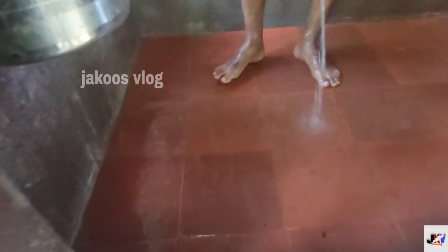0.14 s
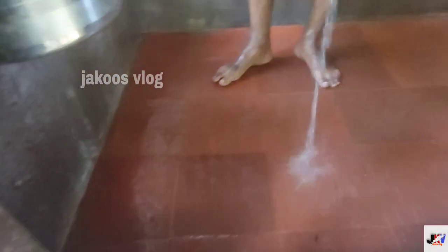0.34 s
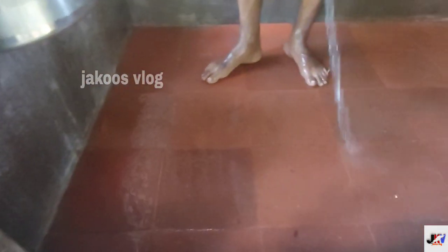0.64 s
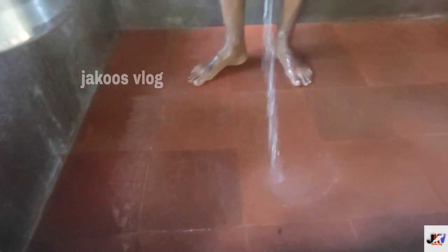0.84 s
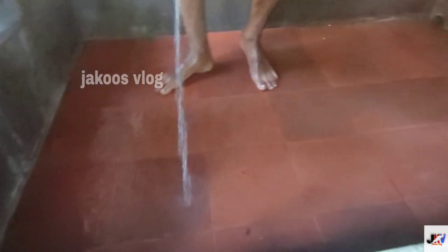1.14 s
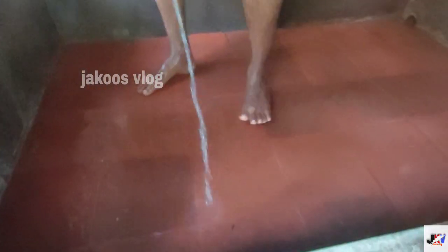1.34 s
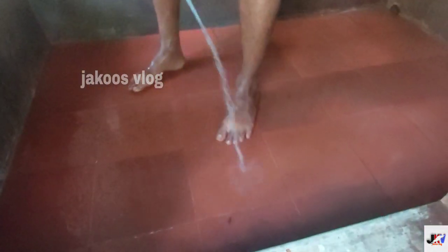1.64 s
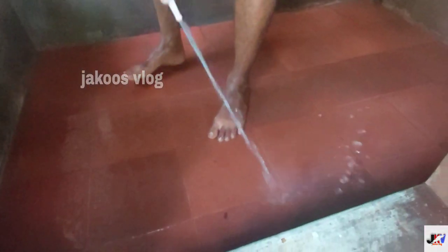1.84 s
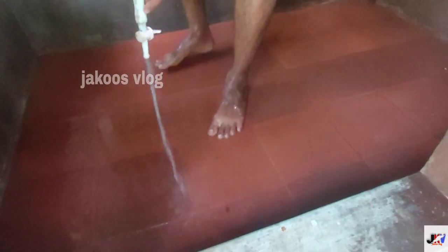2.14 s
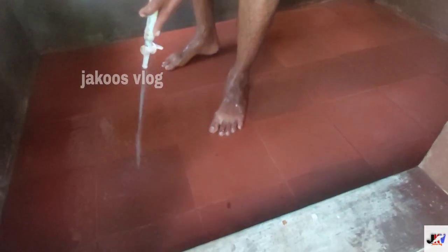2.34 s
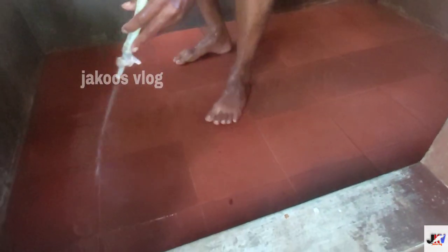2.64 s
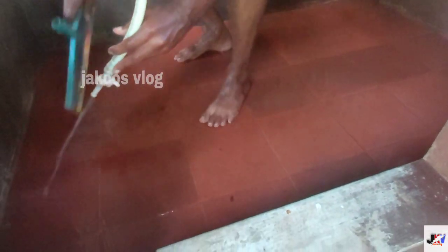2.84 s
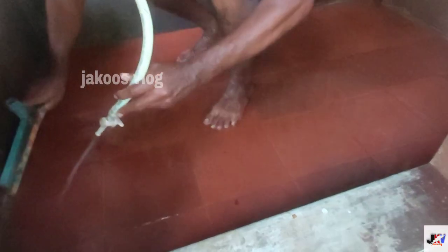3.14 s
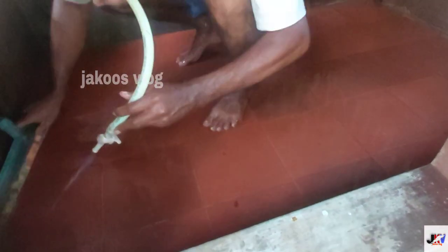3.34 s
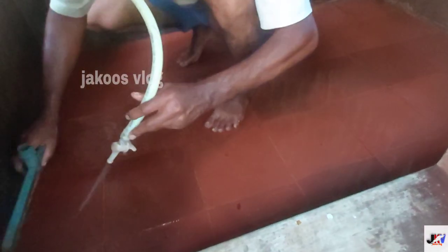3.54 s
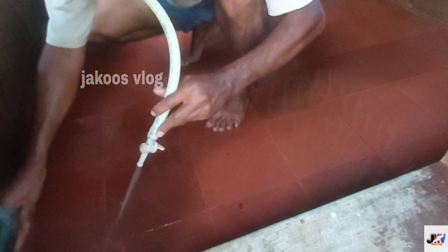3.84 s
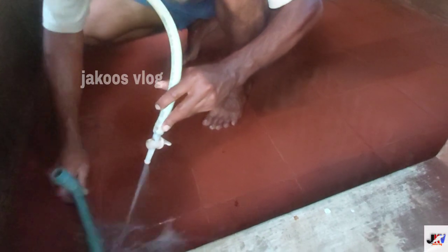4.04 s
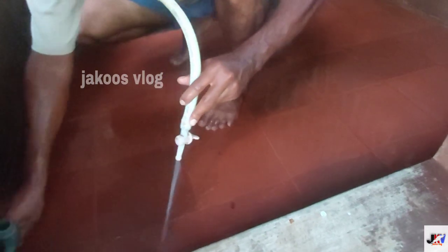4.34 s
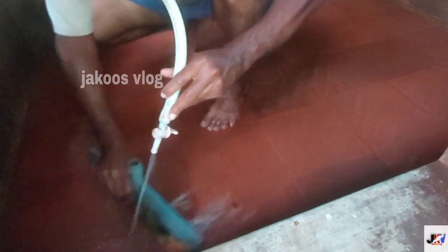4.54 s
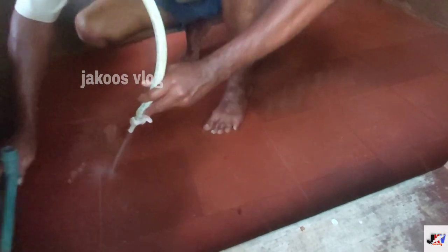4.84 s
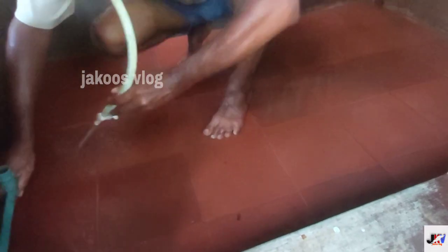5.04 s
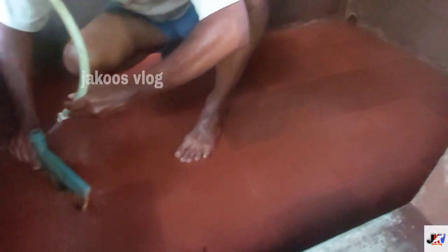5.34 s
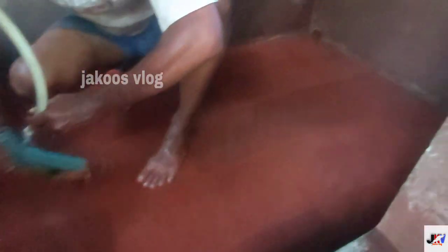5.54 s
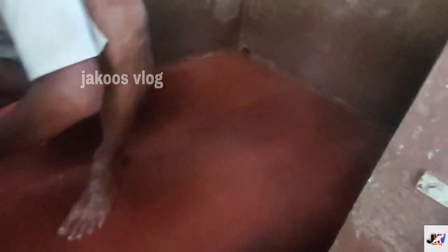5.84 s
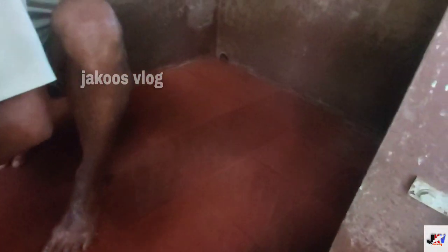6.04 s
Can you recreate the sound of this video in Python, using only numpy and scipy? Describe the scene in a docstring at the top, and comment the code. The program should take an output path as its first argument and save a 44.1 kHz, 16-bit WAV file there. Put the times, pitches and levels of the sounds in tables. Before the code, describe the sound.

A thin hose stream crackles and spatters on wet tiles, then eases while a hand brush knocks and scrubs in short hissing strokes.

```python
"""Water slugs crack and spatter on wet tiles over a fine spray: a thin hose stream in a walled yard.
Each slug is a click and a swell of coarse droplet bursts; the spray is denser bursts of even size.
Distant traffic rumbles below as banded noise. Later a hand brush knocks down on the tiles and scrubs
in short strokes: bristles hiss as dense bursts, while slips and knocks ring the modes of its body."""
import sys
import numpy as np
from scipy import signal
from scipy.fft import rfft, irfft, next_fast_len
from scipy.io import wavfile

SR = 44100
rng = np.random.default_rng(int(sys.argv[2]) if len(sys.argv) > 2 else 0)


def master(y):
    """Save y as 16-bit WAV."""
    cut = np.clip(np.atleast_2d(y).T, -1, 1)
    pcm = np.round(cut * 32767)  # scale
    wavfile.write(sys.argv[1], SR, pcm.astype(np.int16))


N = 273861

# Fine spray of the stream. Each row: time in seconds, level at 6-15 kHz in dB,
# level at 2-5 kHz against it in dB.
SPRAY = [(0, -19.5, -11), (.16, -33, -6), (.76, -30, -11.5), (1.0, -34, -5.5), (1.24, -37, -4.5),
         (1.38, -31, -6.5), (1.5, -33, -4.5), (1.62, -32, -8), (1.78, -32, -10.5), (2.13, -30, -12),
         (2.5, -38.5, -9.5), (2.72, -42, -7), (2.95, -37, -8), (3.4, -40.5, -4), (3.8, -35, -7),
         (4.25, -41.5, -3.5), (4.85, -34.5, -9.5), (5.2, -38.5, -12), (5.7, -42, -9), (6.21, -41, 0)]
# Colour of the water sounds. Each row: frequency in Hz, density in dB per Hz.
WATER = [(590, -58), (1000, -35), (1190, -33.5), (1640, -21.5), (1840, -65), (2360, -13), (3740, -11.5),
         (4490, -6.5), (6790, -10.5), (7880, -0.5), (9040, -4.5), (11200, 1), (15500, -1)]


def amp(db):
    """Decibels are logarithmic: 20 dB is a factor of ten in amplitude."""
    return np.exp(np.asarray(db) * np.log(10) / 20)


def rms_one(x):
    """Normalization to unit effective value."""
    return x / np.sqrt(np.mean(x ** 2) + 1e-20)


def in_time(rows, **outside):
    """Linear interpolation of each column over time, one value per sample."""
    seconds, *columns = np.transpose(rows)
    return np.array([np.interp(np.arange(N) / SR, seconds, column, **outside) for column in columns])


def at_hz(points, hz):
    """Interpolation of a spectrum on a logarithmic frequency axis."""
    point_hz, values = np.array(points).T
    return np.interp(np.log(hz), np.log(point_hz), values)


def drift(rate_hz):
    """Slow random fluctuation: low-passed noise of unit effective value."""
    step = 40   # samples per slow value
    r = np.exp(-2 * np.pi * rate_hz * step / SR)
    noise = rng.standard_normal(N // step + 2002)
    slow = signal.lfilter([1], [1, -2 * r, r * r], noise)[2000:]
    return np.interp(np.arange(N) / step, np.arange(len(slow)), rms_one(slow))


def ports(mid, side, hz):
    """Interchannel coherence and delay: two microphone ports hear partly alike, the left one later."""
    # Each row: frequency in Hz, left-right likeness from 0 to 1.
    likeness = [(30, 1), (150, 0.93), (400, 0.98), (800, 0.73), (2000, 0.14), (8000, 0.086)]
    left_lag = 12   # samples: the sources lie to the right
    alike = np.clip(at_hz(likeness, hz), 0, 1)
    mid = np.sqrt(1 + alike) * mid
    side = np.sqrt(1 - alike) * side
    return np.array([np.roll(mid + side, left_lag), mid - side]) / np.sqrt(2)


def banded(excitation, gain_at, low_hz, high_hz, count):
    """Subband synthesis: neighbouring band-passes ring to unrelated excitations, each with its own gain."""
    out, edges = 0, np.geomspace(low_hz, high_hz, count)
    for k, (low, high) in enumerate(zip(edges, edges[1:])):
        centre_hz = np.sqrt(low * high)
        band_pass = signal.butter(2, [low, high], "band", fs=SR, output="sos")
        mid, side = signal.sosfilt(band_pass, excitation[k % 2] * gain_at(centre_hz))
        out = out + ports(mid, side, centre_hz)
    return out


def droplets(per_s, spread_db, bed):
    """Shot noise: short random bursts on a noise bed, sizes spread in dB; two sets of mid and side."""
    sizes = amp(spread_db * np.minimum(rng.exponential(1, (2, 1, N)), 5))
    impulses = sizes * (rng.random((2, 1, N)) < per_s / SR)
    bursts = rms_one(signal.lfilter([1], [1, -.9], impulses))
    return rms_one((bed + bursts) * rng.standard_normal((2, 2, N)))


def shaped(spectrum, bands):
    """Power summation: the dB offset per (low, high) band that brings its summed level to 0 dB."""
    offsets_db = []
    for low, high in bands:
        power = np.mean(amp(2 * at_hz(spectrum, np.linspace(low, high, 50)))) * (high - low)
        offsets_db.append(10 * np.log10(SR / 2 / power))
    return np.array(offsets_db)


def between(levels_db, centres_hz, hz):
    """Interpolation of band levels on a logarithmic frequency axis."""
    place = np.interp(np.log(hz), np.log(centres_hz), np.arange(len(centres_hz)))
    low = min(int(place), len(centres_hz) - 2)
    return levels_db[low] + (place - low) * (levels_db[low + 1] - levels_db[low])


def around(hz, pitch_hz, above_db, below_db):
    """Spectral peak: a constant loss per octave on either side of a pitch."""
    octaves = np.log2(np.asarray(hz) / pitch_hz)
    return np.minimum(-above_db * octaves, below_db * octaves)


def small_slugs():
    """Random arrivals: small slugs at chance times, set over the spray; rows like those of splats."""
    per_s, over_spray_db, t60_s = 6.3, 2.5, 0.15
    fine_db = in_time(SPRAY)[0]
    draw = rng.random((round(per_s * N / SR), 4)) * [N / SR - .01, 1, 1, 1]
    return [(s, fine_db[int(s * SR)] + over_spray_db + 5.0 * a, -30 + 15 * b, 5500 * 2 ** c, t60_s)
            for s, a, b, c in draw]


def slugs():
    """Impact and spatter: each slug hits with a crack, then scatters coarse droplets that die away."""
    # Clear splats of water, and the onset of a brush stroke at 3.859. Each row: start in seconds,
    # peak level in dB, weight (2-4.5 kHz against the peak level) in dB, pitch of the spatter in Hz,
    # decay time t60 in seconds.
    splats = [(0.075, -32, -27, 13100, 0.049), (0.1203, -11.5, -8, 5190, 0.14),
              (0.194, -15.5, -20, 11800, 0.36), (0.271, -19, -32, 11700, 0.18),
              (0.3463, -8, -30, 11000, 0.12), (0.3945, -5, -21, 5240, 0.14),
              (0.4394, -16.5, -21, 10500, 0.17), (0.4597, -11.5, -18.5, 14400, 0.11),
              (0.4803, -2.5, -30, 7600, 0.087), (0.5641, -12, -21, 7900, 0.17),
              (0.5902, -13.5, -4.5, 5340, 0.14), (0.632, -30, -20, 11500, 0.097),
              (0.6824, -18, -33, 10200, 0.12), (0.7117, -8.5, -30, 11600, 0.075),
              (0.762, -9, -27, 14400, 0.14), (0.8486, -10, -36, 10900, 0.13),
              (0.87, -15.5, -17.5, 9500, 0.36), (0.9223, -12.5, -19.5, 14700, 0.15),
              (1.034, -16, -29, 14500, 0.28), (1.1376, -17, -29, 8060, 0.12),
              (1.1686, -8.5, -16.5, 4650, 0.23), (1.1987, -5, -18, 4540, 0.15),
              (1.2982, -14, -12.5, 11600, 0.1), (1.3221, -7.5, -19.5, 4790, 0.11),
              (1.3528, -15, -15.5, 7710, 0.15), (1.398, -10, -24, 11800, 0.056),
              (1.4158, -11.5, -17, 7600, 0.16), (1.5256, -7.5, -7.5, 7160, 0.081),
              (1.5596, -8, -22, 4520, 0.12), (1.5794, -4, -23, 8000, 0.11), (1.658, -15, -15.5, 8400, 0.11),
              (1.724, -16, -41, 13900, 0.14), (1.7943, -11.5, -22.5, 7800, 0.1),
              (1.8308, -5.5, -13.5, 4530, 0.13), (1.8951, -7.5, -23, 8100, 0.18),
              (1.9729, -11.5, -27, 7930, 0.12), (2.0283, -15, -24, 11700, 0.094),
              (2.0997, -14.5, -30, 8900, 0.22), (2.1974, -23, -32, 8660, 0.12),
              (2.2134, -20, -30, 13000, 0.12), (2.2373, -13.5, -15.5, 7600, 0.18),
              (2.2682, -12, -26, 11800, 0.074), (2.3105, -10.5, -35, 7800, 0.067),
              (2.394, -23, -30, 11400, 0.11), (2.4545, -31, -15, 10300, 0.27),
              (2.4924, -25, -27, 11400, 0.082), (2.6712, -21, -27, 11500, 0.16),
              (2.7444, -17.5, -27, 7900, 0.079), (2.7708, -10, -16.5, 7840, 0.067),
              (2.8155, -20, -37, 14700, 0.11), (2.8724, -23.5, -34, 10700, 0.14),
              (2.9153, -26, -30, 10400, 0.088), (2.9693, -16, -34, 13500, 0.07),
              (3.039, -29, -27, 11700, 0.2), (3.0742, -10, -27.5, 11600, 0.091),
              (3.12, -5, -29.5, 8800, 0.068), (3.279, -24.5, -41, 9400, 0.15),
              (3.324, -23.5, -19, 8500, 0.13), (3.3598, -23, -16, 11800, 0.1),
              (3.3825, -19.5, -24, 7800, 0.14), (3.4154, -16, -19, 8340, 0.086),
              (3.443, -13, -38, 7500, 0.085), (3.484, -18.5, -32, 10100, 0.2),
              (3.5149, -9, -29, 5890, 0.056), (3.5554, -25, -18, 7520, 0.16),
              (3.6193, -13.5, -40, 10800, 0.061), (3.6566, -23, -36, 11400, 0.11),
              (3.693, -24, -21, 11900, 0.087), (3.7155, -17, -25, 13000, 0.085),
              (3.7512, -14.5, -18.5, 8200, 0.075), (3.859, -13.5, -41, 7750, 0.22),
              (3.988, -17, -18, 7870, 0.088), (4.2406, -20, -16, 5060, 0.065),
              (4.2747, -8.5, -31, 10600, 0.061), (4.2964, -16, -19, 9340, 0.19),
              (4.3285, -7.5, -32, 7600, 0.11), (4.3794, -21, -26, 8160, 0.12),
              (4.4595, -14, -32, 10200, 0.092), (4.7974, -26, -8.5, 7970, 0.15),
              (4.8293, -16, -25, 8020, 0.08), (4.8668, -18, -48, 10400, 0.14),
              (4.8933, -18, -51, 7950, 0.083), (4.9474, -15.5, -29, 12000, 0.19),
              (5.0255, -27.5, -5, 8400, 0.13), (5.1136, -21, -33, 7900, 0.1),
              (5.152, -18, -45, 8150, 0.087), (5.194, -14.5, -50, 9900, 0.13),
              (5.251, -15.5, -37, 8040, 0.11), (5.5907, -9, -35, 6910, 0.057),
              (5.6192, -9, -32, 6650, 0.14), (5.7005, -14.5, -36, 11500, 0.11),
              (5.8714, -18.5, -10, 6900, 0.067), (5.9105, -30, -12, 9130, 0.12),
              (5.9374, -21.5, -6, 7850, 0.096)]
    spatter_db = -7.5   # at its pitch, against the peak level
    centres_hz = np.array([3500, 6070, 9050, 12700])
    power, t = np.full((4, N), 1e-12), np.arange(SR // 4) / SR
    # the crack leads the swell, less so in the treble
    crack = np.outer(1.46 * (centres_hz / 6000) ** -0.5, np.exp(-t / 0.0011))
    attack = 1 - np.exp(-t / 0.0034) + crack
    for s, peak_db, weight_db, pitch_hz, t60_s in list(splats) + small_slugs():
        at = round(s * SR)
        colour_db = spatter_db + around(centres_hz[1:], pitch_hz, above_db=9.5, below_db=6.5)
        level = amp(peak_db + np.r_[weight_db - 2.5, colour_db])
        envelope = level[:, None] * attack * amp(-60 * t / t60_s)
        power[:, at:at + len(t)] += envelope[:, :N - at] ** 2
    bands = [(2000, 4780), (4500, 9830), (8000, 13320), (11500, 18900)]
    splat_db = 10 * np.log10(power) + shaped(WATER, bands)[:, None]
    coarse = droplets(1400, spread_db=5.0, bed=0.89)
    # the hard contact is one click in every band
    coarse[:, 0, [round(row[0] * SR) + 20 for row in splats]] = 9.5

    def gain_at(hz):
        return amp(at_hz(WATER, hz) + between(splat_db, centres_hz, hz) + 3.21 * drift(33.0))
    return banded(coarse, gain_at, 886, 17890, count=18)


def spray():
    """Dense shot noise: many fine droplets of even size merge into a wavering hiss."""
    fine_db, mid_db = in_time(SPRAY)
    offsets_db = shaped(WATER, [(2000, 5800), (6000, 16500)])[:, None]
    spray_db = np.array([fine_db + mid_db, fine_db]) + offsets_db

    def gain_at(hz):
        return amp(at_hz(WATER, hz) + between(spray_db, [3200, 9000], hz) - 2.0 + 2.0 * drift(19.0))
    return banded(droplets(5600, spread_db=0.0, bed=1.0), gain_at, 886, 17890, count=18)


def yard(x):
    """Reverberation: walls send back a short diffuse decaying tail, different in each channel."""
    t60_s, level_db = 0.18, -9.5
    t = np.arange(int(.4 * SR)) / SR
    tail = rng.standard_normal((2, len(t))) * amp(-60 * t / t60_s) * (t > .004)
    tail = tail / np.sqrt(np.sum(tail ** 2, axis=1, keepdims=True))
    return amp(level_db) * signal.fftconvolve(x, tail, axes=1)[:, :N]


def traffic():
    """Filtered noise: low rumble and a faint wash above it, wavering band by band."""
    # Far swells. Each row: time in seconds, rumble at 25-150 Hz in dB, wash at 400-1500 Hz in dB.
    swells = [(0, -41, -52), (.5, -46, -53.5), (1.3, -41.5, -56), (1.55, -45, -49), (2.1, -46, -54.5),
              (3, -42, -55.5), (3.7, -43, -46), (4.25, -43.5, -56), (5.0, -43, -49.5), (5.5, -49, -46.5),
              (5.8, -44, -55.5), (6.21, -43.5, -53)]
    # Colour. Each row: frequency in Hz, density in dB per Hz.
    rumble = [(13, -42), (22, -11.5), (49, -2), (75, -1), (98, -1), (127, -12), (380, -20), (495, -22),
              (534, -28), (587, -19.5), (958, -20.5), (1180, -23.5), (2000, -20.5), (2600, -54),
              (4400, -120)]
    level_db = in_time(swells) + shaped(rumble, [(25, 160), (400, 1550)])[:, None]

    def gain_at(hz):
        return amp(at_hz(rumble, hz) + between(level_db, [80, 600], hz) + 1.57 * drift(4.0))
    return banded(rng.standard_normal((2, 2, N)), gain_at, 26.6, 2352, count=18)


def brush_body(body_db):
    """Modal resonance: bristle slips and dull knocks excite the same damped modes."""
    # Modes of the body. Each row: frequency in Hz, level in dB, decay time t60 in seconds.
    modes = [(134, -1, 0.17), (172, -2, 0.13), (227.4, 1, 0.12), (285, -6, 0.084), (332, 1, 0.21),
             (397.7, -3, 0.12), (467, -2.5, 0.088), (544, 3.5, 0.13), (602, -6.5, 0.12), (673, 6.5, 0.09),
             (746, 4.5, 0.11), (832.4, 2.5, .1), (904, 1, 0.14), (973, 7, 0.061), (1070, -0.5, 0.013),
             (1264, 5, 0.067), (1411, -4.5, 0.14), (1560, 6, 0.055), (1735, 3, 0.039), (1976, 4.5, 0.075),
             (2510, 3.5, 0.03)]
    # Mostly the brush set down or bumped. Each row: start in seconds, relative peak level in dB,
    # pitch struck most in Hz, loss an octave from it in dB.
    knocks = [(1.523, -36.5, 1600, 2), (3.098, -44, 600, 5), (3.371, -30, 500, 3), (3.722, -29.5, 545, 14),
              (3.804, -25, 694, 0), (4.31, -24, 710, 3), (4.366, -24.5, 497, 8), (4.385, -20.5, 500, 8),
              (4.404, -15, 335, 16), (4.963, -26.5, 820, 10), (5.027, -26, 990, 1.5),
              (5.073, -11.5, 813, 58), (5.756, -36.5, 302, 0), (5.866, -12.5, 245, 8),
              (5.947, -14, 132, 45)]
    rattle_s, knock_reach_db = 0.0045, -20   # no mode loses more than the reach
    slips, out, t = droplets(900, spread_db=3.0, bed=0.38), 0, np.arange(SR // 10) / SR
    for k, (hz, level_db, t60_s) in enumerate(modes):
        force = slips[k % 2] * amp(between(body_db, [280, 750], hz) - 34.5 + 5.04 * drift(7.9))
        force = force * np.clip(hz / 230, 0, 1) ** 14.0   # dragging hardly moves the lowest modes
        force = force * np.clip(1000 / hz, 0, 1) ** 2.8   # nor the highest
        for s, peak_db, pitch_hz, fall_db in knocks:
            at = round(s * SR)
            # a short decaying rattle that begins just before the blow
            blow = rng.standard_normal((2, len(t))) * np.exp(-t / rattle_s) / np.sqrt(rattle_s * SR)
            # the blow itself: one sharp click 2.5 ms after the row's start
            blow[0, round(.0025 * SR)] += 0.86 * (-1) ** k
            loss_db = max(-fall_db * np.log2(hz / pitch_hz) ** 2, knock_reach_db)
            force[:, at:at + len(t)] += amp(peak_db - 9.0 + loss_db) * blow
        r, w = amp(-60 / (t60_s * SR)), 2 * np.pi * hz / SR
        mid, side = signal.lfilter([0, np.sin(w)], [1, -2 * r * np.cos(w), r * r], force)
        out = out + amp(level_db) * ports(mid, side, hz)
    return out


def bristles(scrape_db, hiss_db):
    """Friction noise: dragged bristles give a dense hiss of small bursts."""
    # Colour. Each row: frequency in Hz, density in dB per Hz.
    colour = [(590, -40), (1000, -10.5), (1100, -23), (1270, 7), (1710, -11.5), (2870, 4), (3300, -4.5),
              (5340, -3), (6710, -8.5), (7880, 0), (8740, -8), (14800, -11), (15500, -35)]
    offsets_db = shaped(colour, [(1500, 2870), (6000, 18000)])[:, None]
    bristle_db = np.array([scrape_db, hiss_db]) + offsets_db

    def gain_at(hz):
        return amp(at_hz(colour, hz) + between(bristle_db, [2800, 9000], hz) + 2.06 * drift(15.0))
    return banded(droplets(8300, spread_db=1.5, bed=0.54), gain_at, 837, 19540, count=14)


def brush():
    """Friction drive: stroke speed sets the hiss, pressure the ring of the body, both the scrape."""
    # One table per stroke. Each row: time in seconds, speed as bristle hiss in dB,
    # pressure as ring of the body in dB, low modes against high in dB.
    strokes = [
        [(3.42, -39, -49, -14), (3.46, -36, -37, -37), (3.512, -35, -39, -38), (3.58, -43, -64, -12)],
        [(3.8, -33.5, -37, -4), (3.85, -28, -52, -1), (3.94, -29, -46.5, -19), (4.1, -26.5, -33.5, -23),
         (4.135, -33.5, -28.5, -14), (4.165, -37, -56, -5), (4.21, -39, -61, 12)],
        [(4.33, -44, -47, 2), (4.4, -38.5, -26, -5), (4.44, -49, -42.5, -4.5), (4.485, -30, -32, -6),
         (4.56, -29, -36, -4), (4.66, -24, -28.5, -17), (4.78, -42, -50.5, 2), (4.81, -49, -57, -2)],
        [(5.09, -48, -35.5, -21), (5.17, -55, -56.5, 0), (5.376, -26, -39, -28), (5.418, -23.5, -33, 4),
         (5.535, -24, -39.5, 10), (5.65, -38, -58, 15), (5.7, -44, -63, 2)],
        [(5.88, -60, -25, -17), (5.914, -34, -47, 11), (5.988, -26.5, -38, -18), (6.096, -27, -39.5, 0),
         (6.21, -33.5, -54, -21)],
    ]
    # Strength of the scrape, one value per stroke in dB.
    stiff_db = [-6.5, -4, -5, -2.5, -1.5]
    by_speed = 0.58   # the scrape lies between speed and pressure
    curves = [in_time(rows, left=-90, right=-80) for rows in strokes]
    speed, press, deep = np.transpose(curves, (1, 0, 2))
    scrape = np.c_[stiff_db] + by_speed * speed + (1 - by_speed) * press
    # each level follows whichever stroke is strongest
    low_db, high_db, scrape_db, hiss_db = np.max([press + deep, press, scrape, speed], axis=1)
    return bristles(scrape_db, hiss_db) + brush_body([low_db, high_db])


def scene():
    """Superposition: water and brush with their yard echo, plus traffic far off."""
    # Stream and brush wander sideways. Each row: time in seconds, left minus right in dB.
    place = [(0, 0), (1.4, 1.5), (3.5, -1.05), (5.3, -0.1), (6.21, 2)]
    near = (slugs() + spray() + brush()) * amp(in_time(place) * [[.5], [-.5]])
    return near + yard(near) + traffic()


def record(dry):
    """Band limits and saturation: the right port is louder in the treble; peaks clip, the top is cut."""
    # Each row: frequency in Hz, left minus right in dB.
    balance = [(60, -2.5), (130, 0), (290, -3), (640, -1.5), (1410, -1.5), (3100, -2.5), (6820, -9),
               (15000, -5.5)]
    overload, cutoff_hz = .86, 15850
    size = next_fast_len(N)
    tilt_db = at_hz(balance, np.maximum(np.arange(size // 2 + 1) * SR / size, 10))
    coloured = irfft(rfft(dry, size) * amp([tilt_db / 2, -tilt_db / 2]), size)[:, :N]
    no_deep_bass = signal.butter(4, 30, "high", fs=SR, output="sos")
    coloured = signal.sosfilt(no_deep_bass, coloured)
    clipped = coloured / (1 + (coloured / overload) ** 6) ** (1 / 6)
    return signal.sosfilt(signal.cheby2(18, 75, cutoff_hz, fs=SR, output="sos"), clipped)


dry = scene()
out = record(dry)
master(out)
```